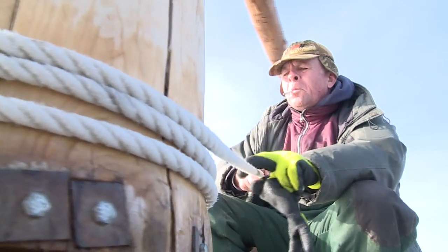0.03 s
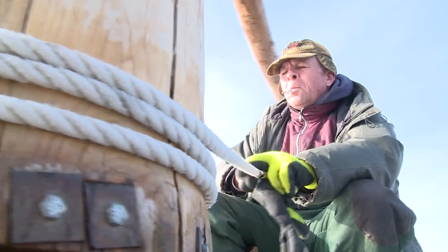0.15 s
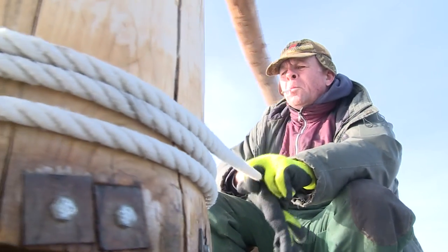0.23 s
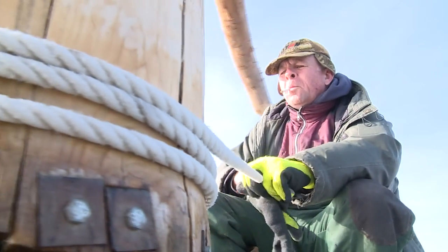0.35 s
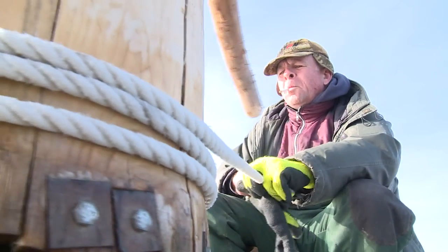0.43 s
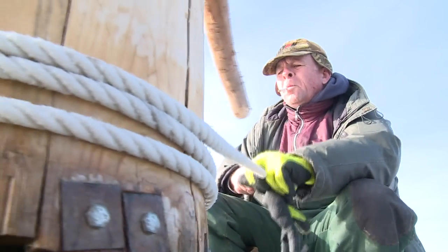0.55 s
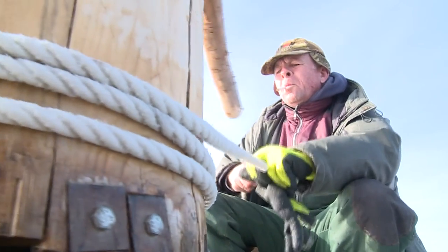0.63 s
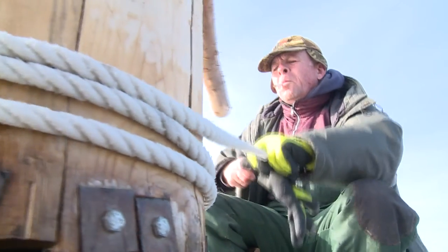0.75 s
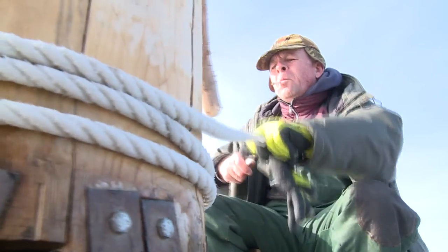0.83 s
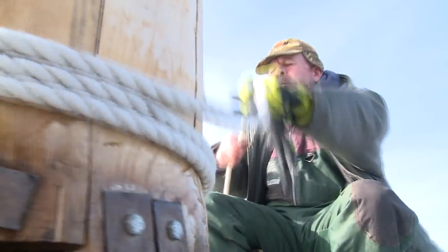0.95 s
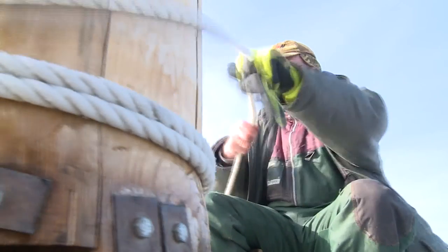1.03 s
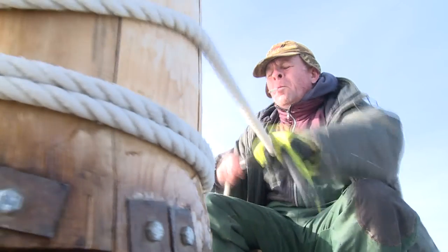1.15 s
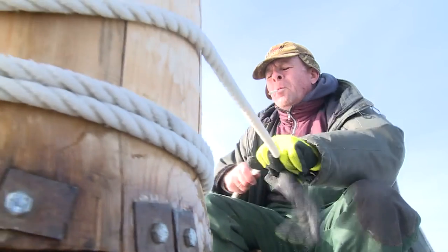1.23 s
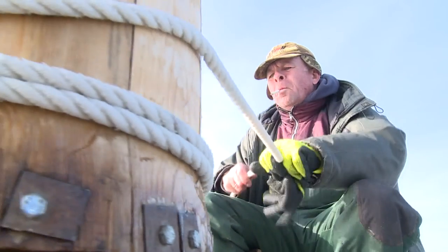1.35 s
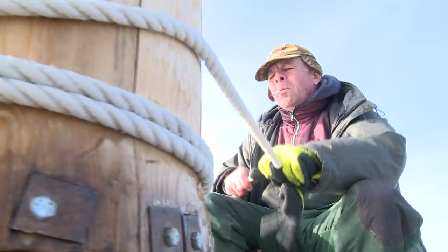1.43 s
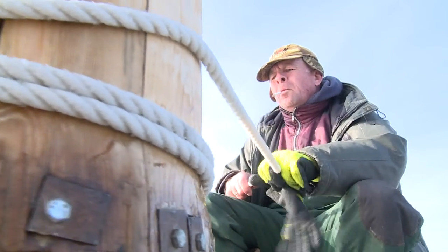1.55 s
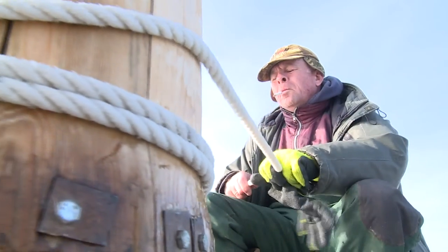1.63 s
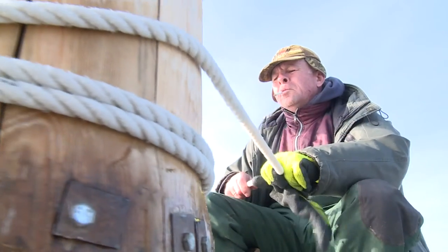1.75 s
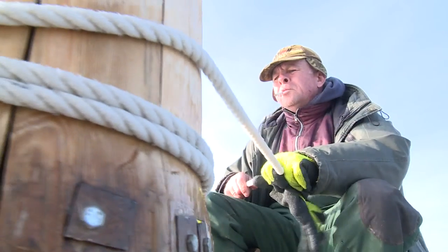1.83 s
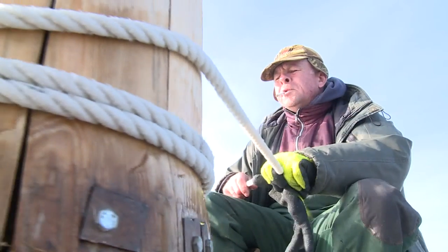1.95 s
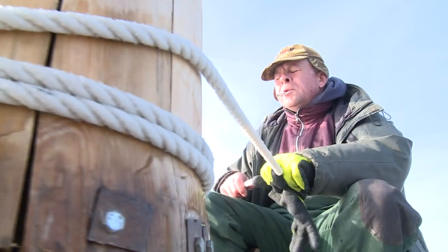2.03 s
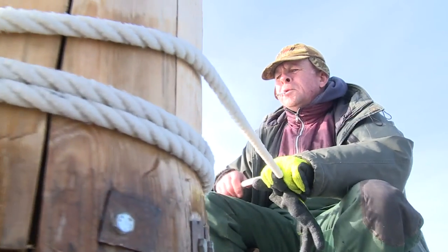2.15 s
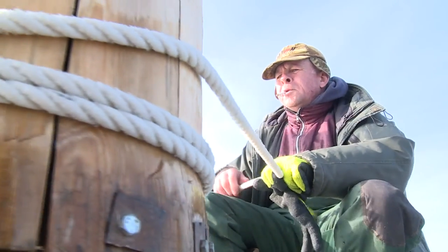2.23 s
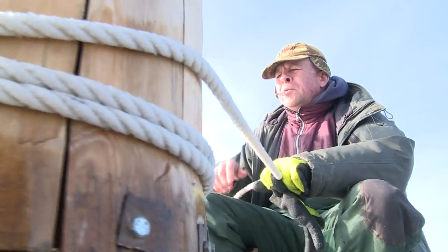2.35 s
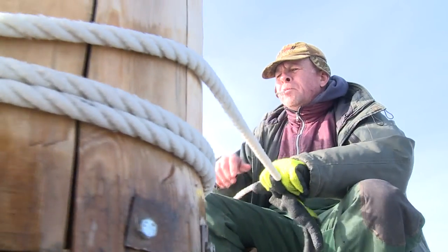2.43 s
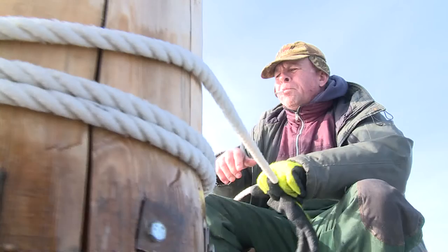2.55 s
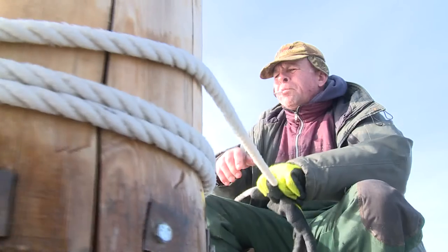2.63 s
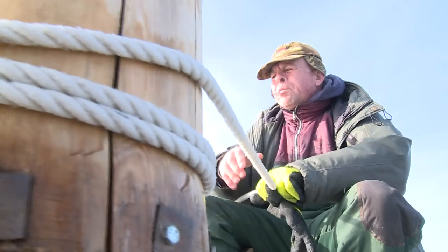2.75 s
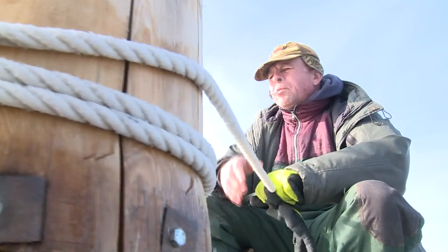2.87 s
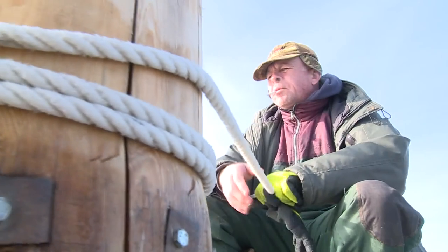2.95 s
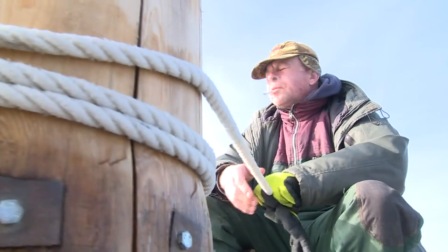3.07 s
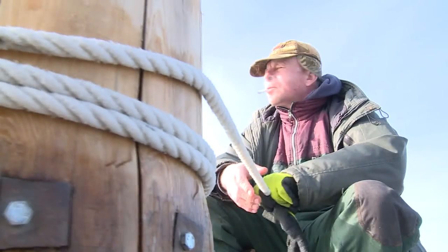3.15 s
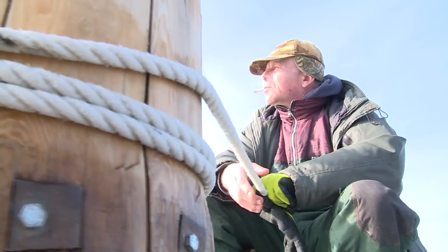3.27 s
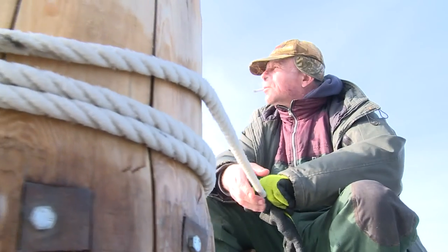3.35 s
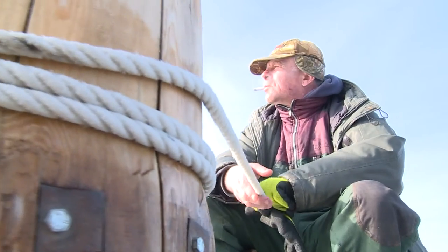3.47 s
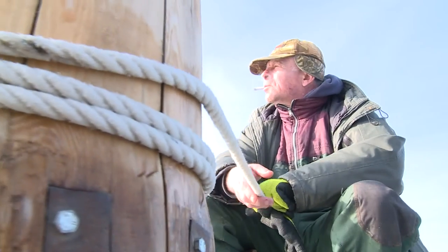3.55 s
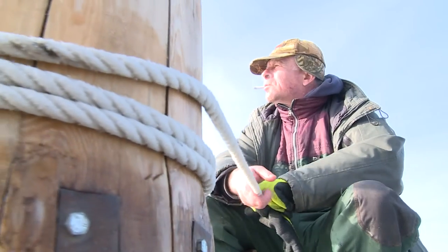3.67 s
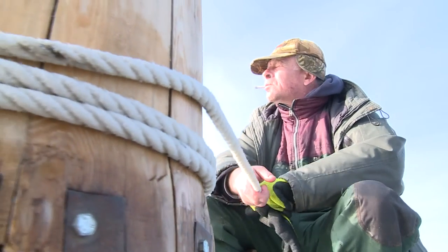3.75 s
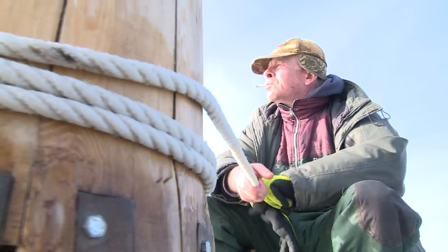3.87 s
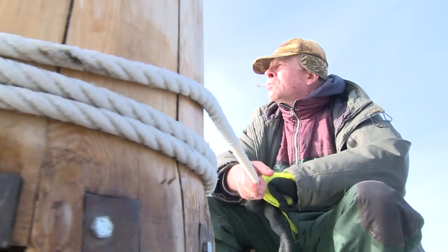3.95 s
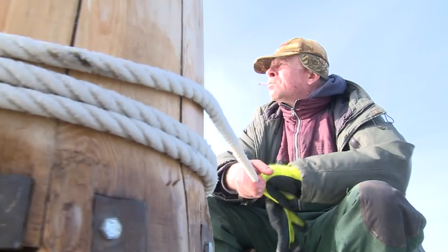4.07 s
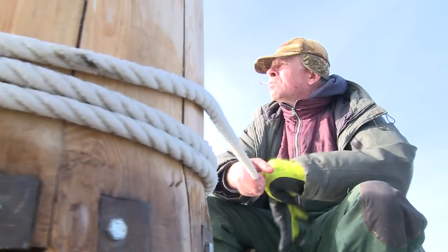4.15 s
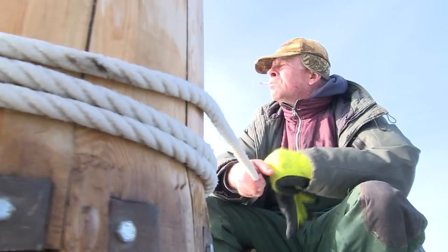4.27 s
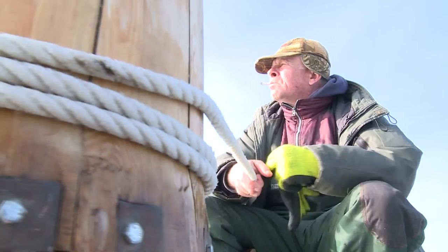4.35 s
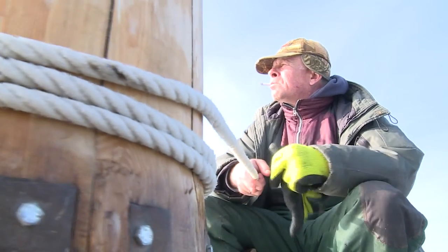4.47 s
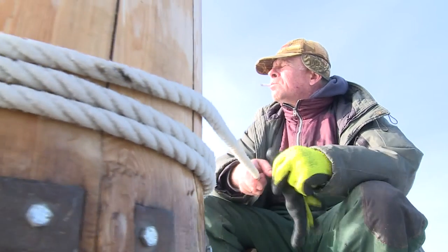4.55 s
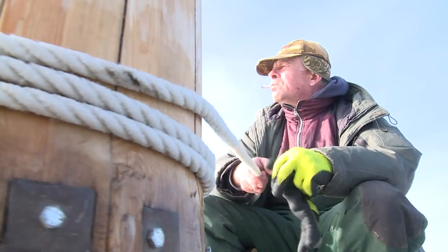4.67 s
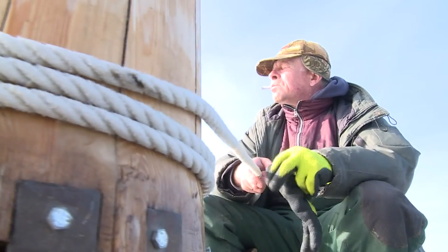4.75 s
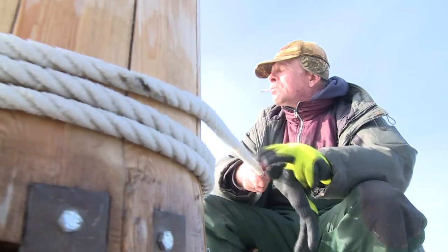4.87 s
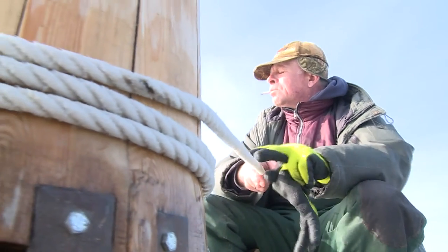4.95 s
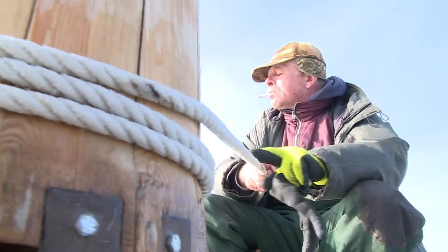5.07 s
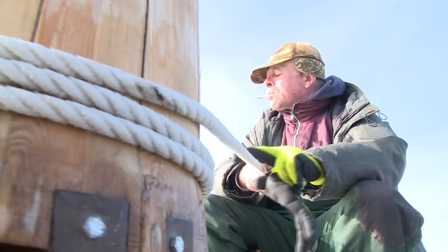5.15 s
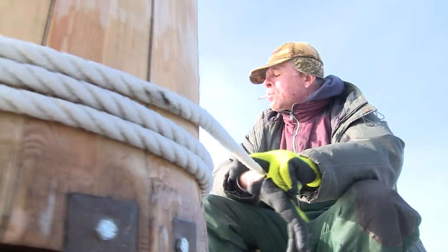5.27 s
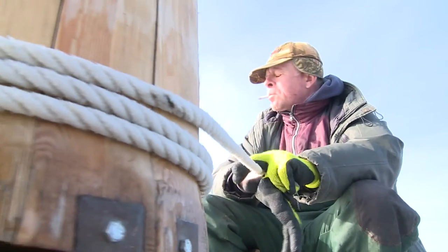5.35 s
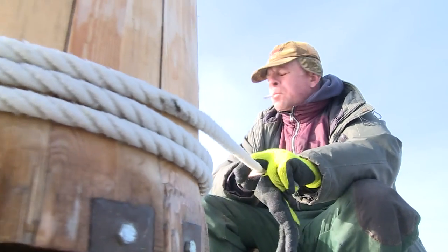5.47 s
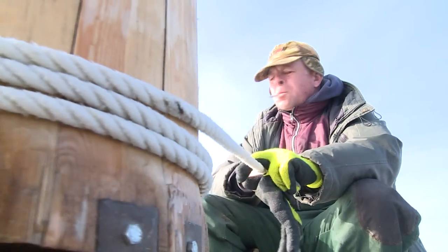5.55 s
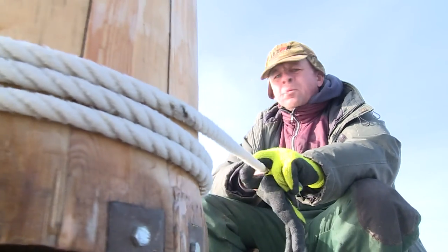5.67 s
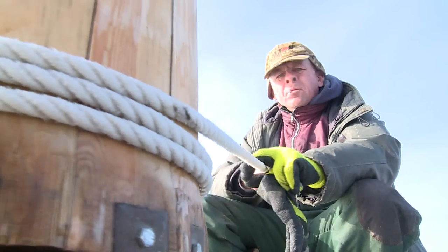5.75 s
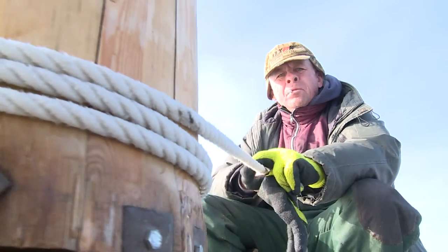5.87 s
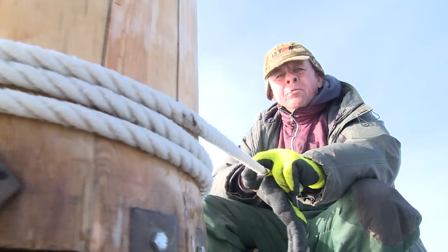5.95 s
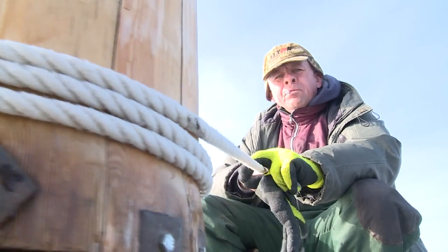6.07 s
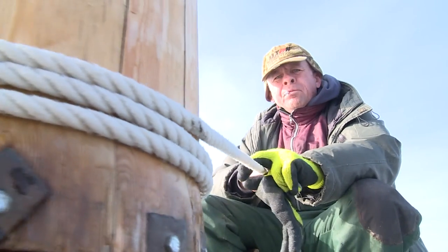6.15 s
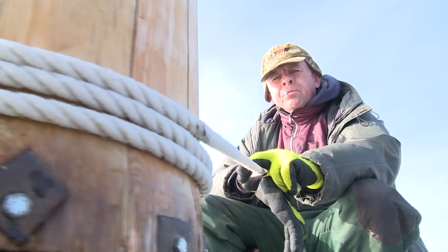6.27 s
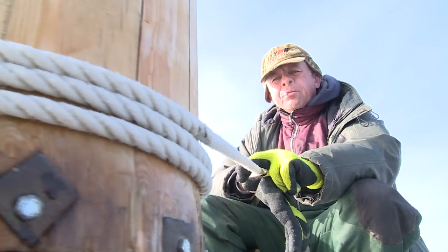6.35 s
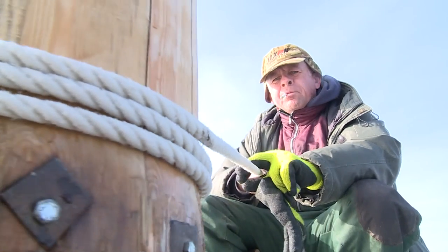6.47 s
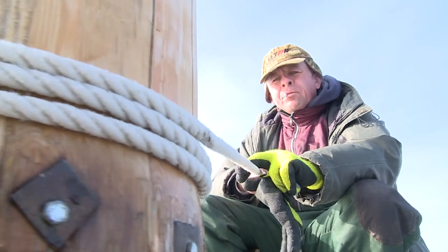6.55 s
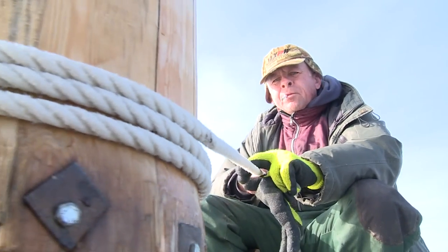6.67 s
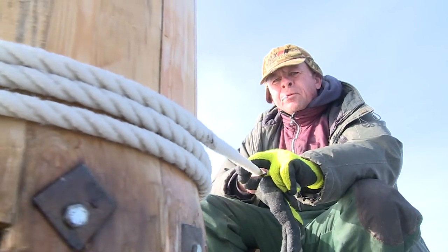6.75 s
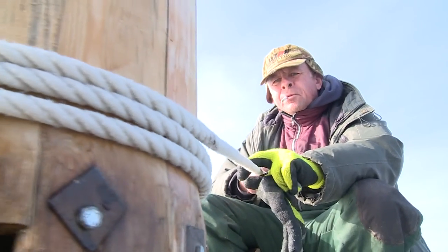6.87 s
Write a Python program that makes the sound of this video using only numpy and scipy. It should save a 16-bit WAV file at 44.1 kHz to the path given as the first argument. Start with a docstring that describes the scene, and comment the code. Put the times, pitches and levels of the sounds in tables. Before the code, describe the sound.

A heavy wooden post turns with dry, gritty rubbing and a nasal, trembling squeal. A sudden crack and hollow thud of rope on wood dominates the start, followed by small ticks. After two seconds the squeal breaks up into crunchy creaks of taut rope; later come brief rope hisses, light knocks and low thumps. Close stereo microphone, open air, no room reverberation.

```python
"""Rope capstan on a frozen lake

A wooden capstan is walked round while a seated man tails the rope off its drum, in open air and close by.
Stick-slip noise grinds in the bearing, where frequency-modulated tones sing; the sliding rope hisses.
Its slips excite damped resonances as creaks, and a turn jumping up the drum knocks on the wood's modes.
Shaped noise gives dull thumps, ticks and whips, and wavering sines give thin squeaks; mid and side form
the stereo."""
import sys
import numpy as np
from scipy import signal
from scipy.fft import rfft, irfft
from scipy.io import wavfile

SR = 44100
rng = np.random.default_rng(int(sys.argv[2]) if len(sys.argv) > 2 else 0)


def pcm_store(signal):
    """Save signal as 16-bit PCM."""
    levels = np.round(np.clip(np.atleast_2d(signal), -1, 1) * 32767)
    wavfile.write(sys.argv[1], SR, levels.astype(np.int16).T)


N = 304731


def amp(db):
    """Logarithmic level: decibels become an amplitude ratio."""
    return 10 ** (np.asarray(db) / 20)


def unit(x):
    """Power normalization: scale to an rms of 1."""
    return x / np.sqrt(np.mean(x ** 2))


def curves(rows):
    """Linear interpolation: each column of a table becomes a line through time."""
    s, *columns = np.transpose(rows)
    return [np.interp(np.arange(N) / SR, s, column) for column in columns]


def spectrum_gain(points, size):
    """Frequency response: gain on a Fourier grid, with decibels interpolated over log frequency."""
    hz, db = np.transpose(points)
    grid_hz = np.arange(size // 2 + 1) * SR / size
    return amp(np.interp(np.log(grid_hz + 1), np.log(hz), db))


def gains(points):
    """Frequency response on the grid of the whole sound."""
    return spectrum_gain(points, N)


def colour(x, points):
    """Minimum-phase filtering: a causal response of unit energy keeps the power of white noise."""
    size = 4096
    cepstrum = irfft(np.log(spectrum_gain(points, size)))
    # folding the cepstrum onto positive time makes the filter causal
    response = irfft(np.exp(rfft(2 * cepstrum[:size // 2], size)))
    return signal.oaconvolve(x, response / np.linalg.norm(response))[:N]


def walk(rate):
    """Band-limited chance: random knots, rate per second, joined by lines and scaled to rms 1."""
    knots = rng.standard_normal(8192)
    return unit(np.interp(np.arange(N) / SR * rate, np.arange(len(knots)), knots))


def grains(rate, spread_db):
    """Random impulse process: tiny slips, rate per second, of random sign and unequal size."""
    chance, sign, size = rng.random(N), rng.standard_normal(N), rng.exponential(size=N)
    slip = chance < rate / SR
    return unit(slip * np.sign(sign) * amp(spread_db * np.minimum(size, 5)))


def decay(t, t60):
    """Exponential damping: a fall of 60 dB in t60 seconds."""
    return np.exp(-np.log(1000) * t / t60)


def bursts(times, dbs, t60s, rise):
    """Impact envelope: each blow rises with a time constant in seconds and dies exponentially."""
    out, t = np.zeros(N + SR), np.arange(SR // 2) / SR
    for s, db, t60 in zip(times, dbs, t60s):
        start = int(s * SR)
        out[start:start + len(t)] += amp(db) * (1 - np.exp(-t / rise)) * decay(t, t60)
    return out[:N]


def ring(x, modes):
    """Modal resonance: convolve with a sum of damped sines of unit total energy."""
    t = np.arange(SR // 2) / SR
    response = sum(amp(db) * np.sin(2 * np.pi * hz * t) * decay(t, t60) for hz, db, t60 in modes)
    return signal.fftconvolve(x, response / np.linalg.norm(response))[:N]


def swell(s, half):
    """Gaussian envelope: a bell-shaped rise and fall round the moment s."""
    return np.exp(-.5 * np.minimum(((np.arange(N) / SR - s) / half) ** 2, 100))


# Relative spectra of the turning post: frequency_hz [Hz], density_db [dB per Hz]
RUMBLE_SPECTRUM = [(20, -84), (50, -15), (100, -8), (160, -2.5), (300, -0.5), (420, -1.5), (600, -2.5),
                   (1000, -46.5)]
GRIND_SPECTRUM = [(250, -22), (420, -3.5), (560, -3), (780, 2), (1000, 2.5), (1300, 1.5), (1500, -9),
                  (2000, -16.5), (4000, -47.5)]
RASP_SPECTRUM = [(900, -30.5), (1200, -0.5), (1400, 2.5), (1600, -1), (1900, -8.5), (2300, -17),
                 (3000, -20.5), (6000, -38.5)]
# Load on the post, as a relative grinding level: time_s [s], load_db [dB]
POST_LOAD = [(0, -46.5), (.3, -46), (.7, -42.5), (1.0, -40.5), (1.35, -43.5), (2.05, -42.5), (2.3, -45),
             (2.6, -45), (3.0, -49.5), (3.85, -48), (4.15, -49.5), (4.4, -48.5), (4.85, -52), (5.45, -48.5),
             (5.9, -49.5), (6.3, -52), (6.7, -48.5), (6.91, -45)]
# Dull low thumps, some perhaps footsteps on the ice:
# start_s [s], rumble_drive_db [dB], grind_drive_db [dB]
DULL_THUMPS = [(1.31, -49, -55), (2.121, -48, -42), (2.55, -49, -37.5), (4.38, -57, -43), (4.612, -50, -59),
               (5.33, -48, -48), (5.367, -43, -48), (5.83, -47.5, -60), (5.958, -45, -45),
               (6.108, -49.5, -60), (6.254, -51, -58), (6.419, -51, -50), (6.58, -49, -49)]
THUMP_T60_S = 0.14
# rumble and rasp follow the load: level at the usual load, and dB gained per dB of load
USUAL_LOAD_DB = -47
RUMBLE_DB, RUMBLE_SLOPE = -55.5, 0.83
RASP_DB, RASP_SLOPE = -51, 1.67


def grinding():
    """Stick-slip friction: slips rumble, grind and rasp, brighter under load; dull thumps swell the noise."""
    load_db, = curves(POST_LOAD)
    extra_db = load_db - USUAL_LOAD_DB
    s, rumble_db, grind_db = np.transpose(DULL_THUMPS)
    t60 = np.full(len(s), THUMP_T60_S)
    rumble_level = amp(RUMBLE_DB + RUMBLE_SLOPE * extra_db) + bursts(s, rumble_db, t60, rise=0.0011)
    grind_level = amp(load_db + 0.9) + bursts(s, grind_db, t60, rise=0.0011)
    rasp_level = amp(RASP_DB + RASP_SLOPE * extra_db)
    # the walks make grind and rumble flicker
    grind = colour(grains(rate=3000, spread_db=2.0), GRIND_SPECTRUM) * amp(1.33 * walk(34))
    rumble = colour(grains(rate=1600, spread_db=2.5), RUMBLE_SPECTRUM) * amp(0.68 * walk(24))
    rasp = colour(grains(rate=3300, spread_db=2.5), RASP_SPECTRUM)
    return grind * grind_level + rumble * rumble_level + rasp * rasp_level


# Relative spectra of the sliding rope: frequency_hz [Hz], density_db [dB per Hz]
HISS_SPECTRUM = [(1500, -15), (2400, -4), (3200, 2.5), (4400, 5), (5500, 6.5), (6100, -1.5), (7000, -1),
                 (8500, 0.5), (14000, -12)]
FINE_TOP_SPECTRUM = [(5000, -10), (6800, 0.5), (7800, 3), (9500, 0), (12000, -1), (15500, -4), (17000, 2.5)]
# Lengths of rope sliding over drum and glove, levels relative:
# top_speed_s [s], hiss_level_db [dB], fine_top_level_db [dB], half_length_s [s]
ROPE_SLIDES = [(.35, -75, -70, 0.33), (0.906, -56.5, -65, .03), (1.095, -55, -66, 0.066),
               (1.38, -63, -65, 0.082), (2.899, -61, -56.5, 0.083), (3.224, -65, -54, .11),
               (3.706, -54.5, -53, 0.091), (3.95, -65, -60.5, .07), (4.38, -55, -58, .07),
               (4.733, -55, -50, 0.089), (5.199, -71, -61.5, 0.25), (5.63, -56, -51, 0.083),
               (6.529, -50.5, -49.5, 0.088), (6.888, -64, -53, 0.026)]
# between slides the rope keeps creeping
CREEP_HISS_DB, CREEP_TOP_DB = -63, -67.5


def hissing():
    """Sliding friction: rope fibres hiss faintly in creep and swell as each length slides through."""
    hiss_level = amp(CREEP_HISS_DB) + sum(amp(db) * swell(s, half) for s, db, _, half in ROPE_SLIDES)
    top_level = amp(CREEP_TOP_DB) + sum(amp(db) * swell(s, half) for s, _, db, half in ROPE_SLIDES)
    hiss = colour(grains(rate=14000, spread_db=3.5), HISS_SPECTRUM) * hiss_level
    top = colour(grains(rate=14000, spread_db=4.0), FINE_TOP_SPECTRUM) * top_level
    return (hiss + top) * amp(0.32 * walk(42))


# Relative spectra of the creaking rope: frequency_hz [Hz], density_db [dB per Hz]
WOODY_SPECTRUM = [(100, -27), (400, -12), (750, -8.5), (1100, -3.5), (1450, 6.5), (1900, -5.5),
                  (2600, -4.5), (5000, -99.5)]
CRUNCH_SPECTRUM = [(1200, -57.5), (2300, -4), (3200, 2.5), (4000, 5.5), (5300, 4.5), (6200, -3.5),
                   (8300, 1.5), (10000, -12), (16000, -35)]
# Resonances of the taut rope on the staves: pitch_hz [Hz], relative_level_db [dB], t60_s [s]
ROPE_MODES = [(701, -1, 0.2), (759, 12.5, 0.092), (1055, -5, 0.12), (1388, -5, 0.07), (1435, -4.5, 0.056),
              (1637, -7, 0.1), (2405, 2, 0.046), (2595, -1.5, 0.057), (2936, 9, 0.027), (3800, 5.5, 0.074),
              (4220, 1, 0.023), (4610, 8.5, 0.046), (5185, 5.5, 0.053), (6880, 14.5, 0.017),
              (8100, 9, 0.016)]
# Slips of the loaded rope: start_s [s], crunch_drive_db [dB], woody_drive_db [dB], t60_s [s]
ROPE_SLIPS = [(2.048, -31, -41, 0.07), (2.133, -41, -37, .11), (2.2045, -36, -40.5, 0.074),
              (2.3043, -30.5, -35, 0.088), (2.447, -38, -40, 0.073), (2.4677, -34.5, -43, 0.069),
              (2.5115, -43, -39.5, 0.16), (2.5702, -40, -38.5, 0.27), (2.7045, -35, -33, 0.073),
              (2.775, -42, -42, .075), (2.844, -33.5, -35, .14), (2.9173, -39, -41.5, 0.059),
              (3.0101, -42.5, -41.5, 0.17), (3.038, -38, -44, 0.089), (3.081, -39, -39.5, 0.082),
              (3.1969, -30, -36.5, 0.088), (3.3488, -35.5, -40.5, .16), (3.496, -35.5, -36, 0.11),
              (3.523, -38.5, -48, 0.19), (3.568, -39, -42, 0.061), (3.6727, -34, -39.5, 0.12),
              (3.931, -42.5, -44, 0.1), (3.9736, -44.5, -43, .17), (4.1265, -46, -41, .05),
              (4.2538, -31, -37.5, 0.072), (4.2945, -49, -42.5, 0.096), (4.608, -35, -32.5, 0.089),
              (6.077, -34, -46, 0.031)]
# lone catches crackle most while the new turn beds in: middle and half length, added and resting drive
BEDDING_S, BEDDING_HALF_S, BEDDING_DB, CRACKLE_DB = 3.23, 1, -60, -63.5


def creaks():
    """Stick-slip excitation: runs of fibre catches ring rope and staves; lone catches crackle between."""
    s, crunch_db, woody_db, t60 = np.transpose(ROPE_SLIPS)
    catches = grains(rate=5000, spread_db=1.5)
    crackle_level = amp(CRACKLE_DB) + amp(BEDDING_DB) * swell(BEDDING_S, BEDDING_HALF_S)
    lone = amp(-0.5) * grains(rate=54, spread_db=0.5) * crackle_level
    woody_drive = catches * bursts(s, woody_db, t60, rise=0.00081) + lone
    crunch_drive = catches * bursts(s, crunch_db, t60, rise=0.00069) + lone
    woody = amp(-4.5) * (woody_drive + amp(2) * ring(woody_drive, ROPE_MODES))
    crunch = amp(-7.0) * (crunch_drive + .5 * ring(crunch_drive, ROPE_MODES))
    return colour(woody, WOODY_SPECTRUM) + colour(crunch, CRUNCH_SPECTRUM)


# Relative spectrum of snapping fibres: frequency_hz [Hz], density_db [dB per Hz]
FIBRE_SPECTRUM = [(3000, -30), (7000, -14), (10000, 4), (13000, -3), (16000, 2.5)]


def stray_fibres():
    """Random impulse process: stray fibres snap free as tiny, briefly decaying clicks."""
    snaps = signal.lfilter([1], [1, -.5], grains(rate=9, spread_db=1.5))
    return amp(-67.5) * colour(snaps, FIBRE_SPECTRUM)


# Squeals of the bearing, held between attack and release, level relative:
# start_s [s], length_s [s], first_pitch_hz [Hz], last_pitch_hz [Hz], level_db [dB]
BEARING_SQUEALS = [(.15, 0.12, 995, 988, -43), (.32, 0.27, 1020, 1050, -41.5),
                   (.655, 0.26, 1215, 1208, -40), (1.09, 0.23, 1190, 1240, -37.5),
                   (1.39, 0.049, 1250, 1230, -40), (1.475, 0.083, 1165, 1120, -36),
                   (1.585, 0.463, 1195, 1220, -36), (2.11, 0.072, 1150, 1130, -40.5),
                   (2.3, .125, 1105, 1005, -39), (3.787, 0.067, 1060, 990, -42.5),
                   (3.85, 0.064, 905, 905, -46), (4.94, .08, 845, 830, -49), (6.55, 0.36, 950, 1048, -53)]
# every squeal catches and lets go alike, and its note wavers as the grip changes
SQUEAL_ATTACK_S, SQUEAL_RELEASE_S = .015, .03
WAVER_PER_S, WAVER_SHARE = 28, .022


def squeal():
    """Frequency modulation: the bearing sings gliding, wavering notes inside rubbing noise that follows."""
    t = np.arange(N) / SR
    hz, envelope = np.full(N, 1. * BEARING_SQUEALS[0][2]), np.zeros(N)
    for s, length, first_hz, last_hz, db in BEARING_SQUEALS:
        corners = [s - SQUEAL_ATTACK_S, s, s + length, s + length + SQUEAL_RELEASE_S]
        gate = np.interp(t, corners, [0, 1, 1, 0]) * amp(db)
        glide_hz = np.interp(t, [s, s + length], [first_hz, last_hz])
        # where squeals overlap, the louder one sets the note
        hz = np.where(gate > envelope, glide_hz, hz)
        envelope = np.maximum(envelope, gate)
    waver = WAVER_SHARE * walk(WAVER_PER_S) + 0.01108 * walk(70)
    phase = 2 * np.pi * np.cumsum(hz * (1 + waver)) / SR
    tone = np.sqrt(2) * np.sin(phase) * amp(2.0 * walk(80))
    # noise on both quadratures forms a narrow and a wide band round the note
    rub = walk(220) * np.sin(phase) + walk(220) * np.cos(phase)
    skirt = walk(800) * np.sin(phase) + walk(800) * np.cos(phase)
    return envelope * (amp(-4.0) * tone + amp(-6.5) * rub + amp(-14) * skirt)


# Relative spectrum of the ticks: frequency_hz [Hz], density_db [dB per Hz]
TICK_SPECTRUM = [(1000, -22), (3000, 2), (5500, 1.5), (8000, 8), (12000, 7), (16000, 1)]
# Small ticks of fibres and clothing: start_s [s], drive_db [dB]
SMALL_TICKS = [(.1565, -44), (.407, -38), (1.0743, -26), (1.096, -38), (1.1398, -36), (1.184, -26),
               (1.2253, -24.5), (1.287, -37.5), (1.4057, -37.5), (1.8103, -35.5), (4.381, -30.5),
               (4.446, -33), (5.5199, -34), (6.268, -43)]


def ticks():
    """Impulsive noise: catching fibres and clothing give short, quickly damped ticks."""
    s, db = np.transpose(SMALL_TICKS)
    envelope = bursts(s, db - 4.5, np.full(len(s), .022), rise=0.00026)
    return colour(rng.standard_normal(N) * envelope, TICK_SPECTRUM)


# Relative spectra of contact and landing: frequency_hz [Hz], density_db [dB per Hz]
CRACK_SPECTRUM = [(500, -15), (1500, 7), (2500, 5.5), (3200, 2), (5200, 5.5), (6400, 0), (8300, 0),
                  (11000, -3), (16000, -11)]
THUD_SPECTRUM = [(50, -32), (110, -46), (160, -13), (240, -13.5), (400, -6.5), (700, 0.5), (1000, 4.5),
                 (1350, 4.5), (1800, -19), (3000, -28), (8000, -51)]
# Modes of the drum: pitch_hz [Hz], relative_level_db [dB], t60_s [s]
DRUM_MODES = [(154, -1, 0.26), (436, -8, 0.34), (575.5, -1, 0.31), (694, -7, 0.34), (854, -4.5, 0.37),
              (967, 7.5, 0.11), (1010, -24, 0.2), (1180, -3, 0.23), (1320, -16, 0.15), (1357, 2, 0.25),
              (1415, 3.5, 0.11), (1744, 0.5, 0.076), (2300, -8.5, 0.11), (2660, -17, 0.09)]
# Hard snaps of the rope against the drum, with the pitch that the struck place favours:
# start_s [s], thud_drive_db [dB], crack_drive_db [dB], contact_t60_s [s], favoured_pitch_hz [Hz]
ROPE_KNOCKS = [(.9126, -8, -9, 0.024, 930), (.926, -18.5, -24, 0.014, 1000),
               (0.9792, -13, -15, 0.025, 1510), (1.879, -46, -26, 0.015, 2460),
               (1.915, -54, -40.5, 0.026, 2500), (3.7863, -25.5, -50, 0.0044, 1100),
               (4.218, -39, -38, .02, 1400), (4.610, -36.5, -63, 0.042, 1400),
               (5.2198, -34, -27.5, 0.024, 1430), (5.366, -35.5, -35, 0.022, 700),
               (5.381, -43, -37, 0.01, 700), (6.078, -42.5, -46.5, 0.032, 1400),
               (6.793, -42, -52, 0.024, 1400)]


def knocks():
    """Modal excitation by impact: a turn of rope cracks at the contact, thuds, then rings the wood."""
    s, thud_db, crack_db, t60, favoured_hz = np.transpose(ROPE_KNOCKS)
    contact = bursts(s, crack_db, t60, rise=0.00089)
    contact_tail = bursts(s, crack_db - 21.5, t60 * 8.6, rise=0.0036)
    crack = colour(rng.standard_normal(N) * (contact + contact_tail), CRACK_SPECTRUM)
    # the thud lands just after the crack
    landing = ((s + 0.002376) * SR).astype(int)
    push_level = bursts(s + 0.0025, thud_db - 1.5, t60 * 1.93, rise=0.00051)
    push = grains(rate=5500, spread_db=4.0) * push_level
    push[landing] += amp(thud_db + 10.0)
    wood = colour(push, THUD_SPECTRUM)
    hz, mode_db, mode_t60 = np.transpose(DRUM_MODES)
    t = np.arange(SR // 2)[:, None] / SR
    modes = np.sin(2 * np.pi * hz * t) * decay(t, mode_t60) * (1 - np.exp(-t / 0.0031))
    # neighbouring modes move in opposite senses
    sense = (-1) ** np.arange(len(hz))
    for start, db, length, centre_hz in zip(landing, thud_db, t60, favoured_hz):
        octaves_away = np.abs(np.log2(hz / centre_hz))
        # a longer push puts more into the wood
        weights = sense * amp(db + 5.0 + mode_db - 6.5 * octaves_away) * np.sqrt(length)
        wood[start:start + len(t)] += (modes @ weights)[:N - start]
    # a high-pass keeps the knocks free of deep bass
    high_pass = signal.butter(4, 130, "high", fs=SR, output="sos")
    return signal.sosfilt(high_pass, crack + wood)


# Relative spectrum of the whipping rope: frequency_hz [Hz], density_db [dB per Hz]
WHIP_SPECTRUM = [(100, -28), (800, -4), (2500, -11), (5200, 3), (6400, -3.5), (8500, 2), (11000, -2.5),
                 (16000, -12)]
# Rope whipping through the glove, level relative: middle_s [s], level_db [dB], half_length_s [s]
ROPE_WHIPS = [(0.959, -24, 0.0058), (1.048, -28, 0.0092), (1.093, -44, 0.0073), (3.15, -47, 0.007)]


def whips():
    """Amplitude-shaped noise: the rope whips through the glove in brief swishes."""
    level = sum(amp(db) * swell(s, half) for s, db, half in ROPE_WHIPS)
    return level * colour(rng.standard_normal(N), WHIP_SPECTRUM)


# Thin squeaks of rope fibres, level relative:
# middle_s [s], mean_pitch_hz [Hz], level_db [dB], half_length_s [s]
FIBRE_SQUEAKS = [(2.996, 3560, -52, .016), (4.218, 3370, -47, .0035), (4.822, 4400, -53, .023),
                 (5.623, 3500, -53.5, 0.02), (6.6, 4040, -49, 0.015), (6.68, 4550, -51, 0.0072)]


def squeaks():
    """Frequency modulation: rope fibres squeak as short sines whose pitch trembles."""
    turns = 2 * np.pi * np.cumsum(1 + 0.0412 * walk(1300)) / SR  # phase per Hz of pitch
    return sum(amp(db) * swell(s, half) * np.sin(hz * turns) for s, hz, db, half in FIBRE_SQUEAKS)


# Side level relative to the source: frequency_hz [Hz], relative_level_db [dB]
# lag between the two microphone ports
PORT_SIDE = [(100, -33), (1300, -34), (3000, -6), (5500, -15.5), (7200, 2.5), (8100, -12), (9800, 3.5),
             (13000, 1), (16000, -16)]
# rope at the glove, which lies off to one side
GLOVE_SIDE = [(100, -40), (5500, -29), (8000, -21), (10000, -15), (13000, -1), (16000, -5)]
# early echoes off the frame
ECHO_SIDE = [(40, -13), (350, -29), (700, -33), (1250, -31), (2400, -11), (4500, -15.5), (8000, -33),
             (15000, -6)]
# grinding and hiss that arrive from all round
DIFFUSE_SIDE = [(40, 0), (120, -6.5), (350, -8), (700, -10.5), (1250, -24), (2400, -33), (4500, -31),
                (8000, -16), (12000, -8), (15000, -23)]
# Left minus right at the microphone: frequency_hz [Hz], difference_db [dB]
LEFT_RIGHT_BALANCE = [(60, -3), (110, 0), (200, 0.5), (380, -0.5), (700, 0.5), (1290, 0.0), (2380, 0.5),
                      (4400, 1.0), (8120, 2), (15000, 2.5)]
# the struck drum is wide and near, so its knocks reach the sides too
DRUM_WIDTH_DB = -26


def scene():
    """Mid-side stereophony: the capstan is ahead; phase lag, echoes and diffuse noise widen it."""
    glove = hissing() + stray_fibres() + ticks() + whips() + squeaks()
    drum = knocks()
    mid = rfft(grinding() + squeal() + creaks() + drum + glove)
    t = np.arange(SR // 10) / SR
    echoes = rng.standard_normal(len(t)) * np.exp(-t / .015)
    echo_response = rfft(echoes / np.linalg.norm(echoes), N)
    # -1j delays every frequency by a quarter cycle
    lagged = -1j * (mid * gains(PORT_SIDE) + rfft(glove) * gains(GLOVE_SIDE))
    scattered = (mid * gains(ECHO_SIDE) + rfft(drum) * amp(DRUM_WIDTH_DB)) * echo_response
    # independent draws of the noise arrive from all round
    diffuse = rfft(grinding() + hissing()) * gains(DIFFUSE_SIDE)
    side = lagged + scattered + diffuse
    lean = np.sqrt(gains(LEFT_RIGHT_BALANCE))
    left, right = (mid + side) * lean, (mid - side) / lean
    return irfft(np.array([left, right]), N) * amp(0.36)


TOP_HZ = 16000


def record(dry):
    """Saturation and band limiting: clip at full scale, then cut the top with an elliptic low-pass."""
    low_pass = signal.ellip(8, .2, 70, TOP_HZ, fs=SR, output="sos")
    return signal.sosfilt(low_pass, np.clip(dry, -1, 1))


dry = scene()
out = record(dry)
pcm_store(out)
```